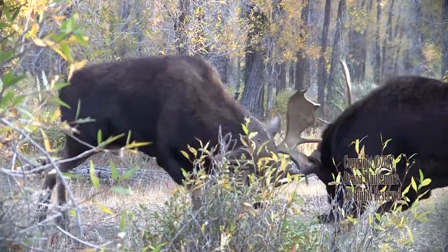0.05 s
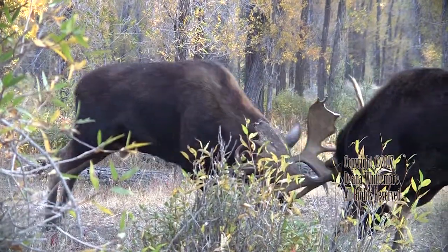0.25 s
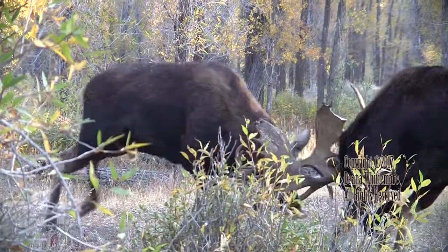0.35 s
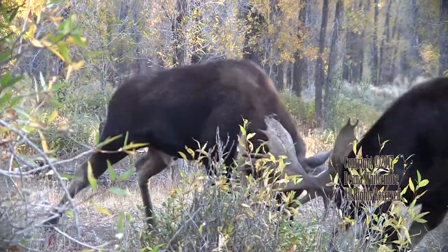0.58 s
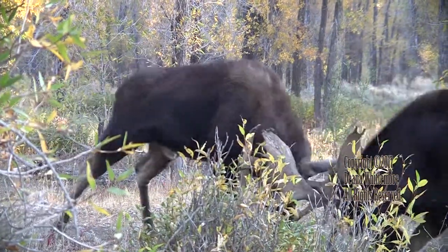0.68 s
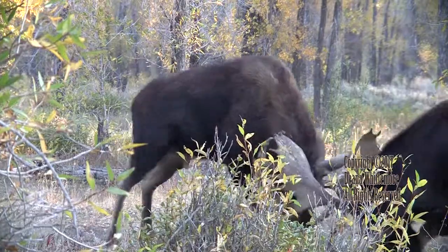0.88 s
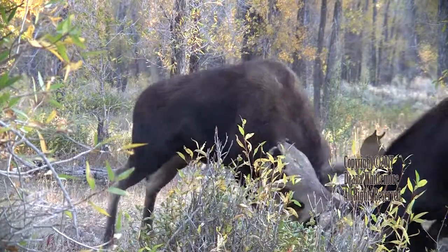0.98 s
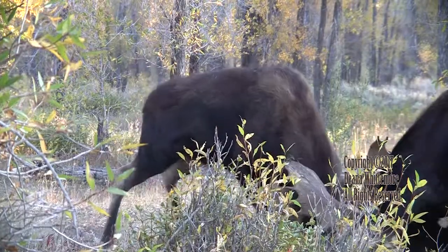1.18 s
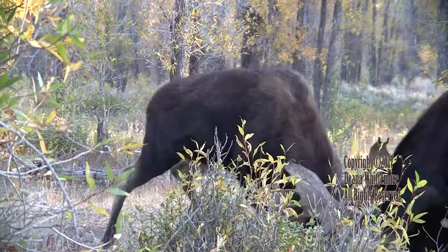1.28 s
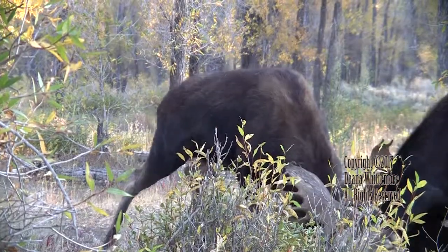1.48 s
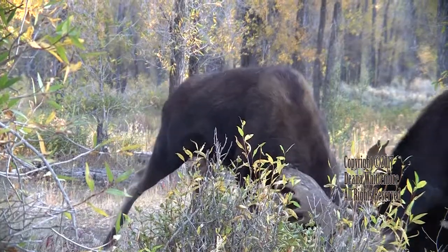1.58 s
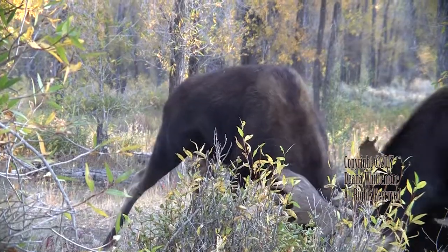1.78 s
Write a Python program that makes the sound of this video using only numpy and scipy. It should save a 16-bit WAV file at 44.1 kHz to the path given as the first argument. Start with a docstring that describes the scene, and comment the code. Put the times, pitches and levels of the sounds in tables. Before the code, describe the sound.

Moose antlers clatter together at the edge of a wood. After soft hoof thuds and rustling, they knock and grind in three bursts from 0.2 to 0.8 seconds, dry and bony over dull thumps, with steps and twig snaps between. More steps crunch through brush, a dry stalk flicks at 1.2 and a twig cracks at 1.4. The rustle thins out over a faint, steady outdoor rush and light echo.

```python
"""Two bull moose spar at the edge of a wood, over a faint, steady outdoor rush.
First hooves thud and brush rustles. From 0.2 to 0.8 s the antlers knock and grind in three bursts,
each knock a dry bony ring over a dull skull thump, with steps and twig snaps in between.
Then a few more steps, a dry stalk flicks at 1.2 s, and the snaps and rustle thin out.
Ground, bushes and trunks scatter the impacts back."""
import sys
import numpy as np
from scipy import signal
from scipy.io import wavfile

SR = 44100
rng = np.random.default_rng(int(sys.argv[2]) if len(sys.argv) > 2 else 0)


def dump_mix(stems):
    """Bounce the given channels to the path in sys.argv[1] as a 16-bit WAV at rate SR."""
    frames = np.atleast_2d(stems).T  # one column per channel
    limited = np.clip(frames, -1, 1)  # hard clip at full scale
    pcm = np.round(limited * 32767).astype(np.int16)
    wavfile.write(sys.argv[1], SR, pcm)


N = 81585
TIME_S = np.arange(N) / SR
AGE_S = np.arange(int(.22 * SR)) / SR   # time within one event

# outdoor rush: (frequency [Hz], relative density [dB])
AIR_SPECTRUM = [(25, -9), (48, -27), (70, 2), (100, 3.5), (150, 2.5), (320, -7), (480, -1.5), (680, 0.5),
                (1000, -4.5), (1600, -12.5), (4000, -22), (16000, -25.5)]
# diffuse sound: (frequency [Hz], left-right correlation [-])
STEREO_CORRELATION = [(30, 0.89), (100, 0.91), (500, 0.71), (1200, 0.019), (3000, 0.39), (6000, 0.046),
                      (10000, 0), (16000, 0.076)]
# return from the trunks: (frequency [Hz], relative density [dB])
ECHO_SPECTRUM = [(100, -9), (170, 2.5), (260, -14), (400, -3), (700, -7.5), (1500, -9), (4000, -5.5),
                 (12000, -0.5)]
# leaves pushed aside: (time [s], level [dB])
RUSTLE_ENVELOPE = [(0, -54), (.06, -49), (.09, -43), (.16, -43), (.22, -45), (.28, -46), (.33, -44.5),
                   (.40, -50), (.49, -45.5), (.53, -38), (.69, -39), (.76, -42.5), (.90, -47), (1.0, -48),
                   (1.11, -45.5), (1.16, -41), (1.27, -50), (1.32, -44), (1.52, -48.5), (1.60, -46.5),
                   (1.68, -56), (1.85, -51)]
# leaf rustle: (frequency [Hz], relative density [dB])
LEAF_SPECTRUM = [(900, 0.5), (2000, 5), (3200, 9), (5000, 6), (8000, 8.5), (12000, -2), (16000, -11.5)]
# leaf balance: (frequency [Hz], left-right [dB])
LEAF_PAN = [(1000, 8), (5000, 0.5), (8000, -0.5), (15000, -26)]
# brush crushed underfoot: (time [s], level [dB])
CRUNCHES = [(.078, -51), (0.133, -60), (0.599, -39), (.662, -29), (0.805, -31), (0.937, -32), (0.986, -33),
            (1.186, -38), (1.571, -42), (1.725, -43)]
# ring of a dry stalk: (frequency [Hz], level [dB], t60 [s])
STALK_MODES = [(5500, 0.5, 0.023), (11600, -1, 0.029), (15000, -4, 0.015)]
# twig breaks: (time [s], level [dB], pitch [Hz], left-right [dB])
TWIG_SNAPS = [(0.1535, -34, 3140, 0), (0.6301, -32, 4500, 2), (0.6535, -28.5, 2260, 7),
              (0.6652, -28, 2530, 0), (0.8075, -38.5, 4500, 7), (0.938, -38.5, 2140, 6),
              (1.0591, -42, 4340, -2), (1.174, -38, 3930, -1), (1.1849, -36.5, 2950, 3),
              (1.2876, -40.5, 3350, 2), (1.3801, -27, 3280, 1), (1.3829, -30.5, 2380, 1),
              (1.623, -44, 4090, 0)]
# hoof falls: (time [s], level [dB])
HOOF_FALLS = [(.078, -47), (0.127, -42.5), (0.159, -38.5), (.578, -34), (0.613, -33), (0.657, -37.5),
              (0.835, -51), (.939, -40.5), (0.987, -39), (1.156, -47.5)]
# skull and neck: (frequency [Hz], level [dB], t60 [s])
SKULL_MODES = [(161.3, -3.5, 0.18), (225.2, -4.5, 0.15), (253.5, 1.5, 0.14), (370.5, -8.5, 0.086)]
# antler palms: (frequency [Hz], level [dB], t60 [s])
PALM_MODES = [(461, -3.5, 0.061), (598, -5.5, 0.06), (655.5, 3.5, 0.098), (700, 2, 0.065), (800, 1, 0.064),
              (850, -10.5, 0.073), (1000, 0, 0.07), (1200, 4.5, 0.048), (1276, 2, 0.048), (1544, 0, 0.07),
              (1638, 4, 0.039), (2055, 3, 0.048), (2678, -0.5, 0.054), (3190, 6.5, 0.013)]
# antler balance: (frequency [Hz], left-right [dB])
ANTLER_PAN = [(500, -2.5), (800, -3), (1200, -0.5), (4000, 11), (10000, 9)]
# antlers grinding: (time [s], length [s], level [dB], favoured pitch [Hz], hardness cut-off [Hz])
SCRAPES = [(0.074, 0.023, -37.5, 2000, 3400), (0.13, 0.015, -37, 1060, 2050),
           (0.375, 0.022, -27.5, 735, 2400), (0.491, 0.012, -31.5, 700, 2200),
           (0.503, 0.02, -24.5, 1000, 2780), (0.523, 0.025, -24.5, 1110, 1800),
           (.730, 0.028, -27, 1200, 3200)]
# antler knocks: (time [s], level [dB], pitch favoured by the struck spot [Hz], hardness cut-off [Hz],
#   lift of that pitch [dB], ring time factor [-], skull thump [dB])
KNOCKS = [(.2357, -17, 1520, 4480, 6, 0.97, -30), (.2977, -14, 3000, 7350, 1.5, 0.77, -37.5),
          (.3005, -22, 660, 1500, 5.7, 1.8, -39.5), (.3075, -17.5, 640, 1700, 11.5, 1.05, -47),
          (.3105, -25, 1300, 1990, 6.2, 0.53, -37.5), (.3365, -19, 650, 2440, 12, 0.84, -43),
          (.342, -19, 660, 1950, 7.1, 0.76, -57), (.3637, -14.5, 700, 2950, 8.4, 0.69, -54),
          (.379, -23, 1200, 2780, 6.8, 1.35, -37), (.4095, -28, 720, 2700, 5, 0.81, -48),
          (.46, -32.5, 700, 1800, 8, 0.56, -38), (.5064, -19.5, 2320, 2960, 4.3, 1.7, -36),
          (.5115, -21.5, 730, 1600, 11, 1.1, -31), (.5252, -18, 750, 1200, 7.9, 0.76, -30.5),
          (.5275, -14.5, 1220, 1400, 13, .95, -30), (.5325, -18.5, 444, 900, 17, 1.1, -30),
          (.539, -15, 1000, 1800, 12.4, 1.1, -39.5), (.544, -24.5, 1260, 1620, 5.7, 0.41, -39),
          (.7036, -14, 804, 3670, 2.9, 0.83, -46), (.7048, -13, 744, 1100, 19, 0.39, -43),
          (.7145, -20, 1390, 2300, 11, 0.86, -31.5), (.7235, -24, 754, 1500, 10, .8, -44),
          (.7434, -26.5, 760, 2460, 6.9, .8, -30.5), (.7685, -33, 650, 1000, 11, 0.5, -40),
          (.7858, -18, 850, 1100, 10, 1.05, -40), (.7895, -24, 1580, 1680, 8.9, .7, -41),
          (.803, -31, 600, 1200, 6.1, 0.92, -30)]

MODE_SCATTER_DB = 2
THUD_RISE_S, THUD_PAN_DB = 0.0024, -2
SPLINTER_T60_S = 0.063


def from_db(db):
    """Decibels to gain."""
    return 10 ** (np.asarray(db) / 20)


def unit_rms(x, samples=None):
    """Scale to unit RMS, taken over the first samples if given."""
    return x / np.sqrt(np.mean(x[..., :samples] ** 2) + 1e-20)


def at_hz(points, hz):
    """Interpolate on a log-frequency axis."""
    point_hz, values = np.transpose(points)
    return np.interp(np.log(hz), np.log(point_hz), values)


def pan(db):
    """Left and right gains."""
    return from_db(np.array([[.5], [-.5]]) * db)


def signs(shape):
    """Random polarities."""
    return rng.choice([-1, 1], shape)


def rise(tau_s):
    """Exponential attack."""
    return 1 - np.exp(-AGE_S / tau_s)


def fade(t60_s, age_s=AGE_S):
    """Exponential decay."""
    return np.exp(-np.log(1000) * age_s / t60_s)


def burst(t60_s):
    """Decaying white noise."""
    return rng.standard_normal(len(AGE_S)) * fade(t60_s)


def rings(hz, t60_s):
    """One decaying sine per mode."""
    return np.sin(2 * np.pi * hz[:, None] * AGE_S) * fade(t60_s[:, None])


def band(x, low_hz, high_hz, order=2):
    """Band-pass."""
    high_hz = min(high_hz, .45 * SR)
    edges_hz = [min(low_hz, high_hz * .9), high_hz]
    return signal.sosfilt(signal.butter(order, edges_hz, "band", fs=SR, output="sos"), x)


def highpass(x, low_hz):
    """Bass cut, 12 dB per octave."""
    return signal.sosfilt(signal.butter(2, low_hz, "high", fs=SR, output="sos"), x)


def add(out, time_s, sound):
    """Mix a sound in."""
    start = int(time_s * SR)
    out[..., start:start + sound.shape[-1]] += sound[..., :N - start]


def coloured(spectrum, source, pans=None):
    """Shape two mid/side pairs into half-octave stereo bands; treble wider than bass."""
    out, edges_hz = 0, 22 * 2 ** np.arange(0, 10, .5)
    for k, (low_hz, high_hz) in enumerate(zip(edges_hz, edges_hz[1:])):
        mid, side = band(source[k % 2], low_hz, high_hz)
        hz = np.sqrt(low_hz * high_hz)
        alike = at_hz(STEREO_CORRELATION, hz)
        gain = from_db(at_hz(spectrum, hz)) * (pan(at_hz(pans, hz)) if pans else 1)
        out = out + gain * (np.sqrt(1 + alike) * mid + np.sqrt(1 - alike) * side * [[1], [-1]])
    return unit_rms(out)


def air(level_db=-42.5, pan_db=-1.5):
    """Steady, low outdoor rush."""
    return from_db(level_db) * pan(pan_db) * coloured(AIR_SPECTRUM, rng.standard_normal((2, 2, N)))


def wood_echo(x, delay_s=0.012):
    """Quick scatter from ground and bushes, faint long tail from the trunks."""
    scatter = coloured(ECHO_SPECTRUM, rng.standard_normal((2, 2, N))) * (TIME_S > delay_s)
    response = 0
    for db, t60_s in (-18.5, 0.086), (-14, 1):   # near, far
        tail = scatter * fade(t60_s, TIME_S)
        midband_power = np.mean(band(tail, 500, 1500) ** 2) * N * SR / 2000
        response = response + from_db(db) * tail / np.sqrt(midband_power)
    return signal.fftconvolve(x.mean(axis=0)[None], response, axes=1)[:, :N]


def crackle(shape, clicks_per_s=2100, hiss_gain=0.15):
    """Tiny equal clicks at random times over a soft hiss."""
    clicks = signs(shape) * (rng.random(shape) < clicks_per_s / SR)
    return unit_rms(unit_rms(clicks) + hiss_gain * rng.standard_normal(shape))


def brush(rustle_trim_db=1, crunch_pan_db=-1.5):
    """Leaves rustle throughout and crunch underfoot."""
    level = from_db(rustle_trim_db + np.interp(TIME_S, *np.transpose(RUSTLE_ENVELOPE)))
    out = level * coloured(LEAF_SPECTRUM, crackle((2, 2, N)), LEAF_PAN)
    envelope = rise(tau_s=0.0041) * fade(t60_s=0.12)
    for time_s, db in CRUNCHES:
        grains = crackle((2, len(AGE_S))) + crackle(len(AGE_S))
        crunch = unit_rms(band(grains, 900, 9000, order=1)) * envelope
        add(out, time_s, from_db(db) * pan(crunch_pan_db) * crunch)
    return out


def stalk(time_s=1.1845, level_db=-34, pan_db=-9.5, grit_db=-1.5):
    """A thin dry stalk flicks close by: grit and a short, high ring."""
    hz, mode_db, t60_s = np.transpose(STALK_MODES)
    ring = unit_rms(from_db(mode_db) @ rings(hz, t60_s), samples=300)
    grit = unit_rms(band(burst(SPLINTER_T60_S), 5200, 16500), samples=300)
    out = np.zeros(N)
    add(out, time_s, ring + from_db(grit_db) * grit)
    return from_db(level_db) * pan(pan_db) * out


def twigs(stem_hz=1100, stem_db=-6, fibre_db=-15, splinter_db=-29):
    """A sharp break knocks the woody stem; fibres tear, faint splinters follow."""
    out = np.zeros((2, N))
    stem = unit_rms(np.sin(2 * np.pi * stem_hz * AGE_S) * fade(t60_s=0.0089), samples=170)
    for time_s, db, hz, pan_db in TWIG_SNAPS:
        fibres = from_db(fibre_db) * burst(t60_s=0.0072)
        splinters = from_db(splinter_db) * crackle((2, len(AGE_S))) * fade(SPLINTER_T60_S)
        snap = band((AGE_S == 0) + fibres + splinters, hz / 1.45, hz * 1.45, order=1)
        snap = unit_rms(band(snap, stem_hz / 2, 7860), samples=170)
        body = from_db(stem_db) * min(1, 2 * stem_hz / hz) * stem
        add(out, time_s, from_db(db) * pan(pan_db) * (snap + body))
    return out


def hooves():
    """Dull thuds in soft ground."""
    out = np.zeros(N)
    for time_s, db in HOOF_FALLS:
        thud = band(burst(t60_s=0.095) * rise(THUD_RISE_S), low_hz=113, high_hz=268)
        add(out, time_s, from_db(db) * unit_rms(thud, samples=1200))
    return pan(THUD_PAN_DB) * out


def skulls(detune=0.021):
    """Each antler knock shakes the heavy heads."""
    hz, mode_db, t60_s = np.transpose(SKULL_MODES)
    out = np.zeros(N)
    for time_s, *_, db in KNOCKS:
        modes = rings(hz * np.exp(detune * rng.standard_normal(len(hz))), t60_s)
        gains = from_db(mode_db + MODE_SCATTER_DB * rng.standard_normal(len(hz))) * signs(len(hz))
        thump = gains @ modes * rise(THUD_RISE_S)
        add(out, time_s, from_db(db) * unit_rms(thump, samples=900))
    return pan(THUD_PAN_DB) * out


def antler_ring(spot_hz, hard_hz, lift_db, ring_factor, detune=0.0099, tine_db=-10.5, lift_oct=0.17):
    """Palm modes and many weak tine modes; pressure between the antlers detunes and damps them."""
    palm_hz, palm_db, palm_t60_s = np.transpose(PALM_MODES)
    tine_hz = np.geomspace(900, 10000, 56)
    tine_t60_s = 0.085 / (tine_hz / 1000) ** 0.81
    count = len(palm_hz) + len(tine_hz)
    hz = np.r_[palm_hz, tine_hz] * np.exp(detune * rng.standard_normal(count))
    modes = rings(hz, ring_factor * np.r_[palm_t60_s, tine_t60_s])
    db = np.r_[palm_db, np.full(len(tine_hz), tine_db)] + MODE_SCATTER_DB * rng.standard_normal(count)
    db += lift_db * np.exp(-.5 * (np.log2(hz / spot_hz) / lift_oct) ** 2)
    gains = from_db(db) / np.hypot(1, (hz / hard_hz) ** 2) * signs(count)
    spread = 0.64 / np.hypot(1, (1500 / hz) ** 2) * signs(count)   # each mode radiates its own way
    return (gains * pan(at_hz(ANTLER_PAN, hz)) * (1 + spread * [[1], [-1]])) @ modes


def contact(spot_hz, hard_hz, lift_db, ring_factor, crack_db=-6, crack_low_hz=574, tick_hz=5230):
    """One antler contact: ring, crack and a tine-on-tine tick that grows with hardness."""
    ring = unit_rms(antler_ring(spot_hz, hard_hz, lift_db, ring_factor), samples=400)
    crack = band(burst(t60_s=ring_factor * 0.041), crack_low_hz, max(hard_hz, 2 * crack_low_hz))
    crack += from_db(lift_db) * band(crack, spot_hz / 1.12, spot_hz * 1.125, order=1)
    crack = from_db(crack_db) * unit_rms(crack, samples=400)
    tick = unit_rms(band(burst(t60_s=0.0029), tick_hz / 7.3, tick_hz * 1.22), samples=400)
    tick *= from_db(-16) * (hard_hz / tick_hz) ** 2
    return unit_rms(ring + crack + tick, samples=400)


def antlers(slips_per_s=900, slip_spread_db=2.5, swell_db=2.5, left_lag_s=2e-5):
    """Single knocks, and scrapes made of a swelling run of tiny slips."""
    out = np.zeros((2, N))
    for time_s, db, spot_hz, hard_hz, lift_db, ring_factor, _ in KNOCKS:
        add(out, time_s, from_db(db) * contact(spot_hz, hard_hz, lift_db, ring_factor))
    for time_s, length_s, db, spot_hz, hard_hz in SCRAPES:
        ring = contact(spot_hz, hard_hz, lift_db=6.5, ring_factor=0.83)
        slips = (rng.random(len(AGE_S)) < slips_per_s / SR) & (AGE_S < length_s) | (AGE_S == 0)
        force_db = slip_spread_db * rng.standard_normal(len(AGE_S)) + swell_db * AGE_S / length_s
        force = slips * from_db(force_db) * signs(len(AGE_S))
        grind = signal.fftconvolve(ring, force[None], axes=1)
        add(out, time_s, from_db(db) * unit_rms(grind, samples=int(length_s * SR) + 1))
    left, right = highpass(out + 1e-18, low_hz=403)   # bass radiates badly
    return np.array([np.interp(TIME_S - left_lag_s, TIME_S, left), right])


def scene():
    """The fight, its echo, brush and outdoor air."""
    fight = antlers() + skulls() + hooves() + twigs() + stalk()
    return fight + wood_echo(fight) + brush() + air()


def record(dry, low_hz=45, high_hz=15750):
    """Bass cut, peak clip, steep treble cut."""
    clipped = np.clip(highpass(dry, low_hz), -.95, .95)
    return signal.sosfilt(signal.ellip(12, .1, 80, high_hz, fs=SR, output="sos"), clipped)


dry = scene()
out = record(dry)
dump_mix(out)
```